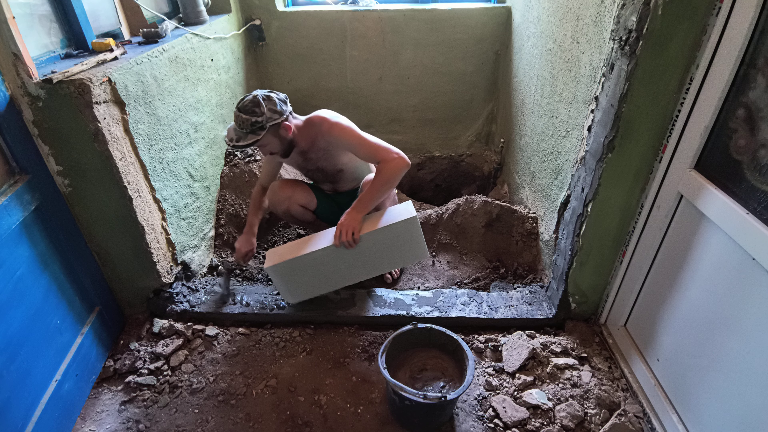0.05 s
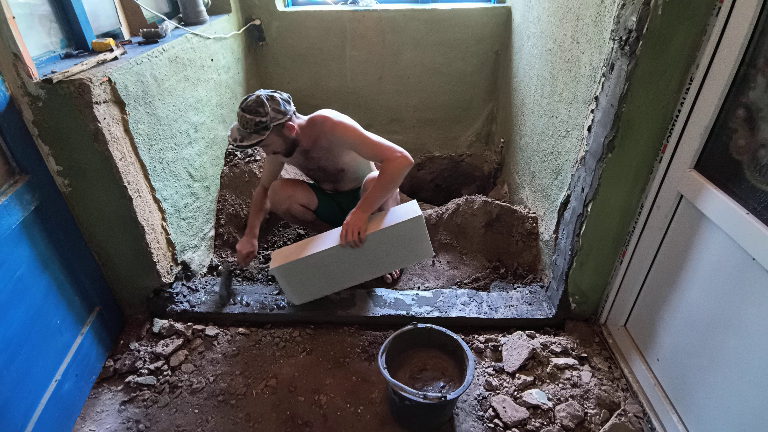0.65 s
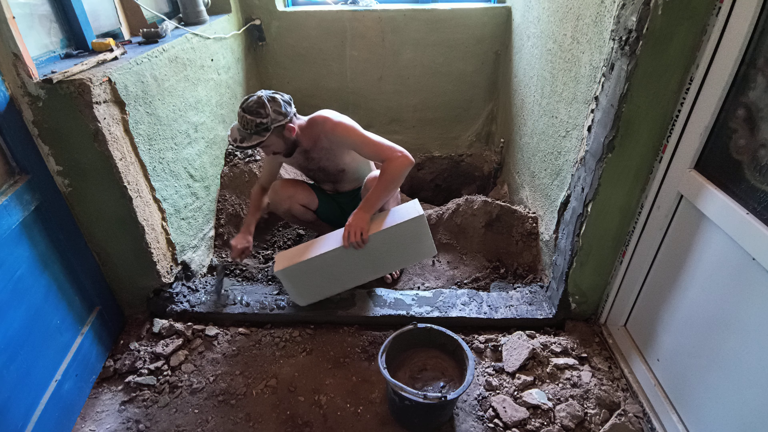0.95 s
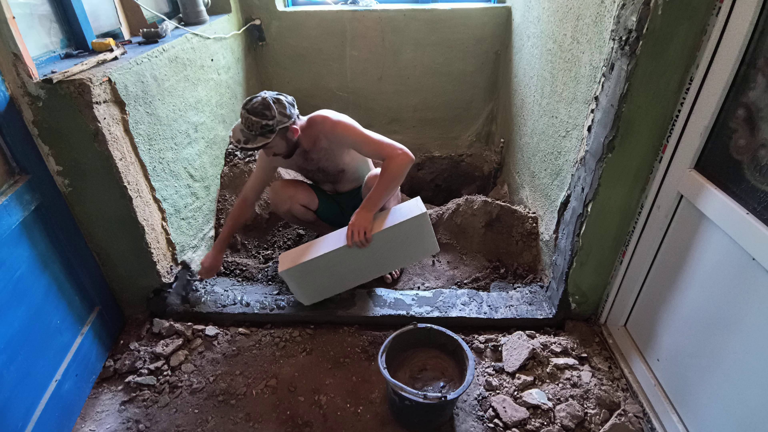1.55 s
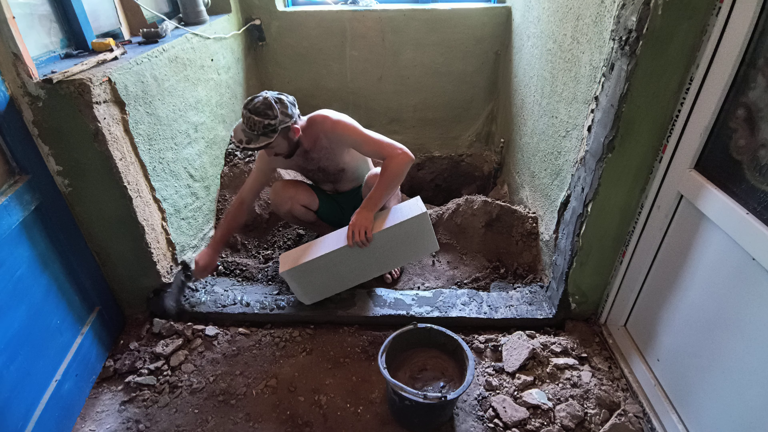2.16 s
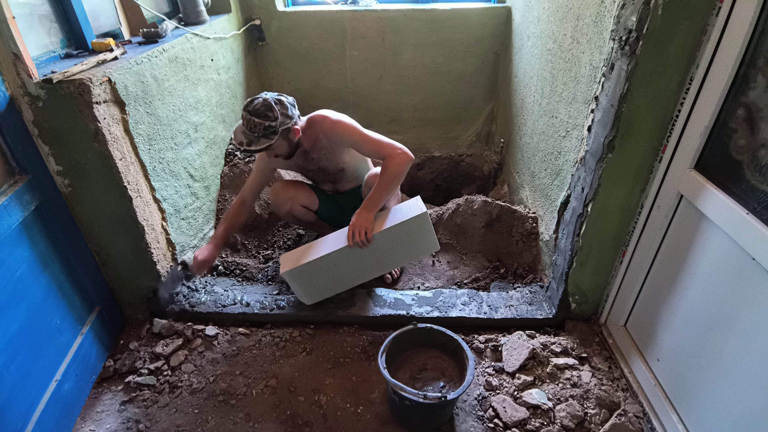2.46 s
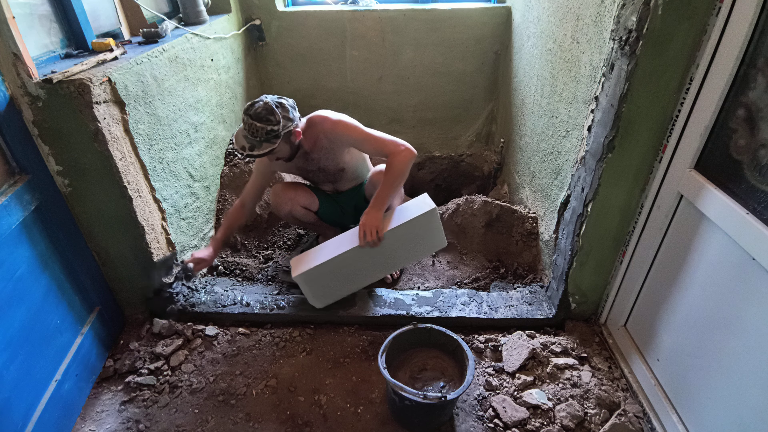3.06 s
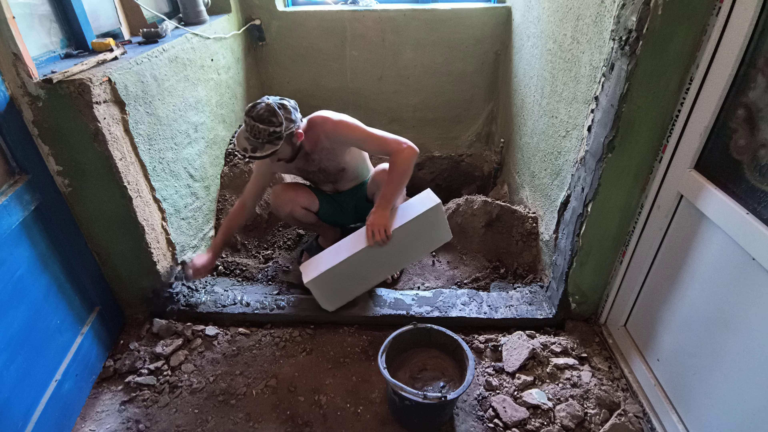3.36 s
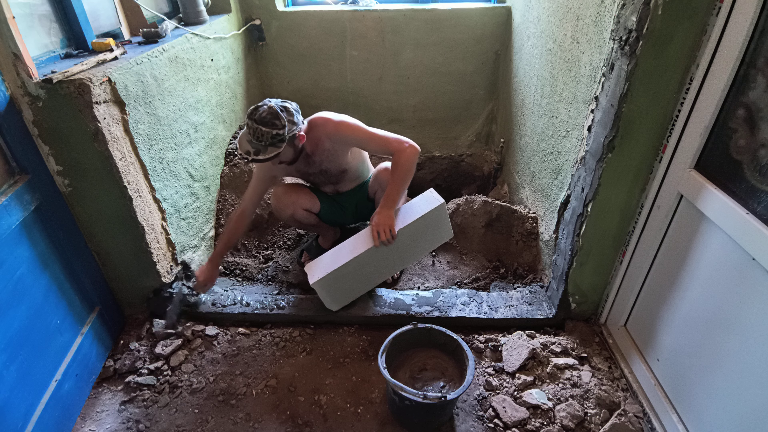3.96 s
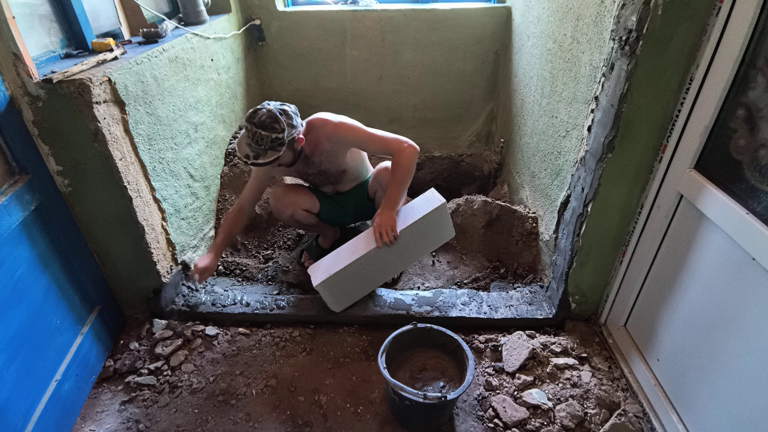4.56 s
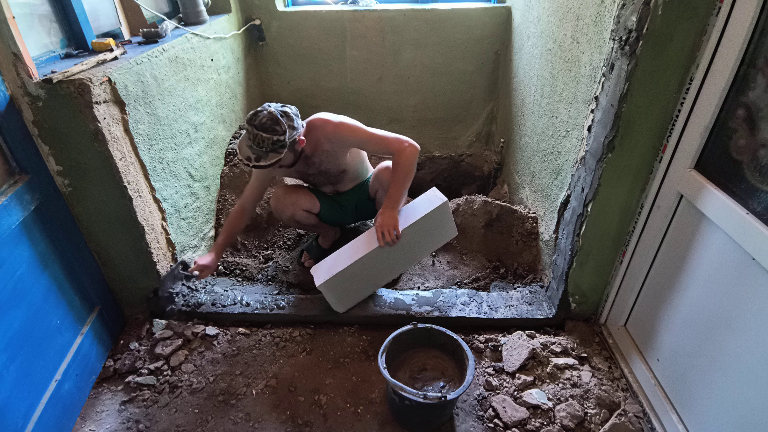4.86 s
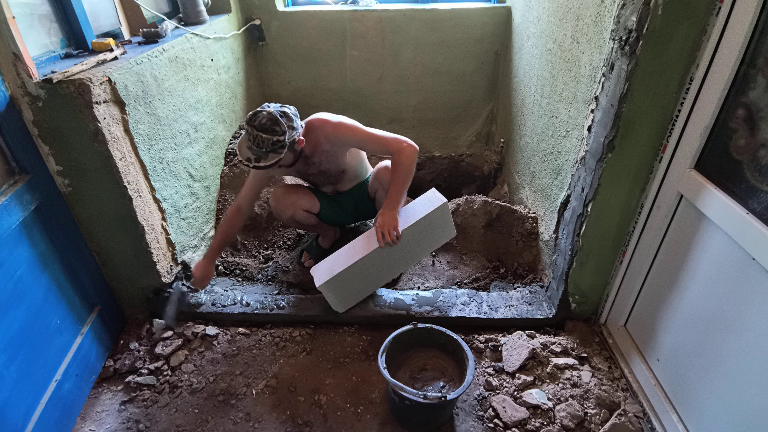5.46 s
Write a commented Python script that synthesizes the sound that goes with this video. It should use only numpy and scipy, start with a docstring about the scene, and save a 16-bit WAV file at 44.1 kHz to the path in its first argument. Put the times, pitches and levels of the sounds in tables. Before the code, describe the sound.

In a small room with bare plastered walls, someone knocks a hand tool against sandy mortar. A second of soft pats comes first, then a short gap, then a steady run of about seventeen harder blows that thump and crunch. The tool rings more clearly near the end and now and then scrapes faintly over sand. Short echoes follow each hit over a faint hush, picked up with a crisp, sharp top end.

```python
"""Six light taps sound in a small bare room; after a pause come steady hard blows: a mason is knocking
a hand tool against a gritty mortar bed. Each impact thumps the floor, crushes sand grains and rings
the tool, which now and then brushes loose sand as it lifts. The plastered walls answer with close
echoes, a flutter, a short tail and booming standing waves, over a faint hush.
A microphone resonance near 9 kHz makes every crack sharp."""
import sys
import numpy as np
from scipy import signal
from scipy.fft import rfft, irfft, next_fast_len
from scipy.io import wavfile

SR = 44100
rng = np.random.default_rng(int(sys.argv[2]) if len(sys.argv) > 2 else 0)


def unload_audio(sound):
    """Save the sound as a 16-bit wav file, at the path given as the first command line argument."""
    columns = np.transpose(np.atleast_2d(sound))
    # keep every value between -1 and 1, then stretch to whole-number steps
    steps = np.round(np.clip(columns, -1, 1) * 32767)
    wavfile.write(sys.argv[1], SR, steps.astype(np.int16))


N = 246959
RING = 3 * 2 ** 13   # samples in one contact's response
AGE = np.arange(RING) / SR

# light taps with the flat face, against a typical hard blow: (time [s], force [dB], sand crushed [dB])
FACE_TAPS = [(0.0, -7.5, -25), (0.1771, -5, -19.5), (0.366, -5, -16.5), (0.558, -5, -20), (0.747, -5, -23),
             (0.9124, -7.5, -19)]
# hard blows with the edge, one landing twice:
# (time [s], force [dB], sand crushed [dB], time the sand takes to give way [s], spot resonance [Hz])
EDGE_BLOWS = [(1.3869, -3.5, .5, 0.0029, 228), (1.6688, -1.2, -0.7, 0.00038, 3000),
              (1.9366, -0.1, 0.5, 0.0014, 237), (2.204, -1.3, 1.2, 0.00012, 614),
              (2.466, 6, -1.6, 0.002, 660), (2.7331, 3.5, 0.3, 0.00072, 1940),
              (2.9923, -1.6, 1, 0.00087, 810), (3.2448, -3.5, 3, .013, 426), (3.493, -10, 2, .007, 594),
              (3.522, 0.5, 2.5, 0.0013, 2660), (3.7884, -4.5, 1.4, 0.0019, 550),
              (4.047, 1.5, -5.5, 0.0015, 480), (4.3075, 4.5, -4.5, 0.0031, 1710),
              (4.5613, -5, -5.5, .0012, 477), (4.818, -2.5, -2.7, 0.0025, 500),
              (5.0578, 5.5, -4, .0013, 1800), (5.2914, 1.8, -3, 0.0034, 1950),
              (5.522, -9.5, 1, 0.0074, 450)]
# force feeds the thud, sand the crack:
# (frequency [Hz], typical level [dB], slope with force [dB/dB], slope with sand [dB/dB])
CONTACT_SPECTRUM = [(75, 19.5, 0.58, 0), (220, 20.5, 1.05, 0), (329, 20.5, 1, 0), (550, 21, 0.87, 0),
                    (890, 16, 0.7, 0.32), (1800, 10.5, 0.3, .36), (3440, 5, 0, 0.85), (9000, 6, 0, 1.1242)]
# the changing grip: (time [s], free ring of the tool [dB], sound thrown into the room [dB])
GRIP_GAINS = [(0, -12, 0), (1.4, -21, -1.5), (3.2, -13.5, -0.1), (4.05, -1, 0.1), (5.3, -2.5, 0),
              (5.52, -29, 0.5)]
# first arrivals from tool, wall and floor: (delay [s], left gain [dB], right gain [dB])
SHORT_PATHS = [(0, 0, -3), (.0026, -6, -1), (.0068, -11, -8)]
# filter on the first arrivals: (frequency [Hz], gain [dB])
ARRIVAL_COLOUR = [(40, -17.5), (120, -10), (250, -26.5), (550, -6.5), (1200, -25), (3000, -4.5), (8500, -2),
                  (15000, -1)]
# ring of the tool and its handle: (frequency [Hz], energy [dB], t60 [s], swell time [s])
TOOL_RING_MODES = [(407, -26, 0.21, 0.069), (422.8, -20.5, 0.11, 0.083), (1510, -18, .22, 0.0018),
                   (1564, -16, 0.28, 0.001), (1534, -44, .2, 0.0019), (1700, -24, 0.5, 0.0075),
                   (1890, -32.5, 0.31, 0.0036), (2270, -19.5, 0.089, .003)]
# hollow pat of the tool on the bed: (frequency [Hz], energy [dB], t60 [s], swell time [s])
BED_PAT_MODES = [(201.5, -26, 0.18, 0.016), (306, -26.5, 0.078, 0.017), (534.4, -30, 0.15, 0.013),
                 (617, -26.5, 0.095, 0.015), (865, -22, 0.095, 0.0069)]
# standing waves of room and floor: (frequency [Hz], energy [dB], t60 [s], swell time [s])
STANDING_WAVES = [(55.3, -23, 0.19, 0.16), (68.7, -38.5, 0.17, .06), (105.8, -27.5, 0.46, 0.032),
                  (120.2, -38.5, 0.28, 0.02), (153.8, -24, 0.85, 0.021), (186, -26.5, 0.86, 0.0034),
                  (216.7, -23.5, 0.51, 0.0079), (241.7, -30.5, 0.66, 0.015), (249.4, -28.5, 0.49, 0.067),
                  (285, -28.5, 0.29, 0.0066), (306.3, -28, 0.42, 0.036), (432.4, -24, 0.16, 0.046),
                  (480, -27, 0.34, 0.025), (519, -22.5, 0.21, 0.014), (556, -29, 0.2, 0.076),
                  (580, -27.5, 0.15, 0.01), (629, -31, 0.51, 0.055), (701, -26.5, 0.075, 0.0086),
                  (760, -37.5, 0.12, 0.045), (856, -48.5, 0.1, 0.0049)]
# filter on the echoes between the end walls: (frequency [Hz], gain [dB])
END_WALL_COLOUR = [(60, -21), (130, -17), (300, -17.5), (600, -7.5), (1000, -30.5), (2500, -22.5),
                   (9000, -41)]
# diffuse reverberation: (frequency [Hz], level [dB], t60 [s])
TAIL_BANDS = [(44.8, -6.5, 0.74), (102, -3.5, .35), (220, -1.5, 0.28), (380, -5.5, 0.49), (530, -0.5, 0.27),
              (1005, 1.5, 0.3), (2000, 1, 0.27), (4500, 0, 0.25), (9200, -1, 0.22), (14900, -1, 0.2)]
# the lifted tool brushes loose sand: (time [s], duration [s], gain [dB])
BRUSH_STROKES = [(2.621, 0.054, -44), (2.658, 0.1, -47.5), (3.213, 0.024, -52.5), (3.74, 0.041, -55),
                 (5.44, 0.018, -49)]
# spectrum of brushed sand: (frequency [Hz], gain [dB])
SAND_COLOUR = [(1000, -15), (4000, -17.5), (7300, -6), (8500, -9), (11000, -10.5), (15000, -9)]
# still room and hiss: (frequency [Hz], relative spectral density [dB])
HUSH_SPECTRUM = [(25, 0), (55, 6), (105, -28.5), (220, -3), (550, -5.5), (1000, -11), (1600, -14.5),
                 (4000, -16.5), (9000, -17), (15000, -10.5)]
# likeness of the sound field at the two ears: (frequency [Hz], left-right correlation [-1 to 1])
EAR_CORRELATION = [(50, .99), (160, .92), (240, .7), (320, .8), (500, .55), (620, .6), (850, .2),
                   (1100, -.35), (1800, -.25), (2400, 0), (15000, 0)]
# response of the resonant microphone: (frequency [Hz], gain [dB])
MICROPHONE_RESPONSE = [(20, -2.5), (40, -2), (6000, 2), (7300, 5), (8500, 12.5), (9800, 12.5), (11200, 0.5),
                       (13000, -4.5), (15600, -8.5)]

TAP_GIVE_S, TAP_SPOT_HZ = 0.03, 292   # the flat face presses the sand slowly, always on one spot
FLAT_PAT_DB, EDGE_PAT_DB = 2, -14
DIRECT_DB, FLUTTER_DB, TAIL_DB, STANDING_DB = 0.5, -1.8, -1.57, -1.74


def tool_impacts():
    """Source and filter: each contact's spectrum shapes the summed response of tool, bed and room."""
    out = np.zeros((2, N))
    echoes = from_db(FLUTTER_DB) * flutter_echo()
    grip_s, *grip_db = np.transpose(GRIP_GAINS)
    contacts = [(*tap, TAP_GIVE_S, TAP_SPOT_HZ, FLAT_PAT_DB) for tap in FACE_TAPS]
    contacts += [(*blow, EDGE_PAT_DB) for blow in EDGE_BLOWS]
    tails = diffuse_tails(len(contacts))
    for (onset, force_db, sand_db, give_s, spot_hz, pat_db), tail in zip(contacts, tails):
        free, thrown = [from_db(np.interp(onset, grip_s, column)) for column in grip_db]
        direct = from_db(DIRECT_DB) * colour(first_arrivals(give_s), ARRIVAL_COLOUR)
        tool = free * modal_ring(TOOL_RING_MODES, scatter_rad=1, scatter_db=0.5)
        pat = from_db(pat_db) * modal_ring(BED_PAT_MODES, scatter_rad=0.43)
        standing = from_db(STANDING_DB) * modal_ring(STANDING_WAVES, scatter_rad=0.56, lag_s=0.014)
        room = thrown * (echoes + standing + from_db(TAIL_DB) * tail)
        spectrum = impact_spectrum(force_db, sand_db, spot_hz)
        add(out, onset, colour(direct + tool + pat + room, spectrum))
    return out


def impact_spectrum(force_db, sand_db, spot_hz, spot_db=5.5, spot_octaves=0.22, uneven_db=3.5):
    """Impact excitation: force adds weight, sand brightness, the spot a peak, uneven landing humps."""
    hz = np.geomspace(30, 16000, 500)
    typical_db, per_force, per_sand = [at_hz(CONTACT_SPECTRUM, hz, column) for column in (1, 2, 3)]
    broad_db = typical_db + force_db * per_force + sand_db * per_sand
    spot = np.exp(-(np.log2(hz / spot_hz) / spot_octaves) ** 2)
    humps_hz = np.linspace(np.sqrt(600), np.sqrt(16000), 64) ** 2
    heights = np.clip(rng.standard_normal(len(humps_hz)), -2, 1.3)
    humps = np.interp(hz, humps_hz, heights, left=0)
    return np.column_stack([hz, broad_db + spot_db * spot + uneven_db * humps])


def first_arrivals(give_s, split_hz=580):
    """Multipath propagation: a bass push and a treble burst of breaking grains take the shortest paths."""
    out, age = np.zeros((2, RING)), AGE[:4096]
    burst = (1 - np.exp(-age / 0.00056)) * np.exp(-age / give_s)
    push = butterworth((age == 0) + 1e-18, 2, split_hz, "low")
    for delay, left_db, right_db in SHORT_PATHS:
        # rough plaster scrambles the grains on every path
        grains = unit_energy(burst * rng.standard_normal((2, len(age))))
        crack = butterworth(grains + 1e-18, 2, split_hz, "high")
        thump = push * np.exp(-delay / 0.0087)
        add(out, delay, from_db([[left_db], [right_db]]) * (crack + thump))
    return unit_energy(out)


def modal_ring(modes, scatter_rad, scatter_db=0, lag_s=0):
    """Modal superposition: damped sinusoids swell and die, excited a little differently each time."""
    out = np.zeros((2, RING))
    for k, (hz, energy_db, t60, swell_s) in enumerate(modes):
        swell = 1 - np.exp(-(AGE / swell_s) ** 2)
        envelope = np.sqrt(2) * unit_energy(swell * decay(t60))
        # higher modes reach the two ears out of step
        ear_phase = np.arccos(at_hz(EAR_CORRELATION, hz)) / 2 * (-1) ** k
        phase = scatter_rad * rng.normal() + ear_phase * np.array([[1], [-1]])
        wave = np.cos(2 * np.pi * hz * (AGE - lag_s) + phase)
        out += from_db(energy_db + scatter_db * rng.normal()) * envelope * wave
    return out


def flutter_echo(trips=8, first_s=0.015, round_trip_s=0.0312, loss_db=4):
    """Repeated reflection: the dull part of a blow runs between the end walls, losing energy as it goes."""
    out = np.zeros((2, RING))
    for trip in range(trips):
        level_db = -loss_db * trip + rng.standard_normal((2, 1))
        add(out, first_s + trip * round_trip_s, from_db(level_db))
    return colour(out, END_WALL_COLOUR)


def diffuse_tails(count, shared_power=0.5, start_share=0.31, swell_s=0.097):
    """Reverberation: noise bands swell, then decay; the pattern shifts in part with each contact."""
    shared = np.sqrt(shared_power) * stereo_noise(RING)
    spectra = rfft([shared + np.sqrt(1 - shared_power) * stereo_noise(RING) for _ in range(count)])
    bins, edges = np.fft.rfftfreq(RING, 1 / SR), np.geomspace(30, 17000, 14)
    swell = 1 - (1 - start_share) * np.exp(-AGE / swell_s)
    out = np.zeros((count, 2, RING))
    for low, high in zip(edges, edges[1:]):
        hz = np.sqrt(low * high)
        attack = 1 - np.exp(-AGE / (0.00067 + 1 / hz))
        envelope = attack * swell * decay(t60=at_hz(TAIL_BANDS, hz, column=2))
        band = irfft(spectra * ((bins >= low) & (bins < high)))
        gain = np.sqrt(2 * (high - low) / SR) * from_db(at_hz(TAIL_BANDS, hz))
        out += gain * unit_energy(band * envelope)
    return out


def sand_brushes(room_t60=0.28):
    """Friction noise: short sandy scrapes, each adding in power to its own reverberant wash."""
    out = np.zeros((2, N))
    for onset, duration, gain_db in BRUSH_STROKES:
        stroke = np.sin(np.pi * np.minimum(AGE / duration, 1)) ** 2
        wash = signal.fftconvolve(stroke, unit_energy(decay(room_t60)) ** 2)[:RING]
        scrape = np.sqrt(np.abs(stroke + wash)) * stereo_noise(RING)
        add(out, onset, from_db(gain_db) * colour(scrape, SAND_COLOUR))
    return out


def room_hush():
    """Stationary noise: the rumble and hiss of the still room, at unit mean power."""
    return np.sqrt(N) * unit_energy(colour(stereo_noise(N), HUSH_SPECTRUM))


def stereo_noise(size):
    """Interaural correlation: white noise, alike at both ears in the bass, unrelated in the treble."""
    alike = at_hz(EAR_CORRELATION, np.fft.rfftfreq(size, 1 / SR))
    mid, side = rfft(rng.standard_normal((2, size)))
    return irfft(np.sqrt((1 + alike) / 2) * mid + np.sqrt((1 - alike) / 2) * side * [[1], [-1]], size)


def colour(x, points):
    """Minimum-phase filtering through (frequency [Hz], gain [dB]); folding the cepstrum makes it causal."""
    size = 2 * next_fast_len(x.shape[-1] // 2 + 2048)
    magnitude = from_db(at_hz(points, np.fft.rfftfreq(size, 1 / SR)))
    cepstrum = irfft(np.log(magnitude))
    cepstrum[1:size // 2] *= 2
    cepstrum[size // 2 + 1:] = 0
    return irfft(rfft(x, size) * np.exp(rfft(cepstrum)))[..., :x.shape[-1]]


def butterworth(x, order, hz, kind):
    """Filtering with a maximally flat passband."""
    return signal.sosfilt(signal.butter(order, hz, kind, fs=SR, output="sos"), x)


def decay(t60):
    """Exponential damping: a fall of 60 dB in t60 seconds."""
    return from_db(-60 * AGE / t60)


def at_hz(points, hz, column=1):
    """Interpolation of a table column on a log-frequency axis."""
    points = np.array(points)
    return np.interp(np.log(hz + 1e-9), np.log(points[:, 0]), points[:, column])


def from_db(db):
    """Decibels as an amplitude ratio."""
    return 10 ** (np.asarray(db) / 20)


def unit_energy(x):
    """Normalisation to an average energy of one per channel."""
    return x / np.sqrt(np.mean(np.sum(x ** 2, axis=-1)) + 1e-20)


def add(out, onset, sound):
    """Superposition of a sound at an onset in seconds."""
    start = round(onset * SR)
    out[:, start:start + sound.shape[-1]] += sound[:, :max(0, N - start)]


def scene():
    """Linear mixing: impacts, scrapes and hush pass through the microphone's resonance."""
    return colour(tool_impacts() + sand_brushes() + from_db(-65) * room_hush(), MICROPHONE_RESPONSE)


def record(dry):
    """Band limiting and soft saturation: deep bass is dropped, peaks are rounded and the top is cut."""
    rounded = np.tanh(butterworth(dry, 4, 35, "high"))
    return signal.sosfilt(signal.ellip(10, 0.2, 80, 15800, fs=SR, output="sos"), rounded)


dry = scene()
out = record(dry)
unload_audio(out)
```